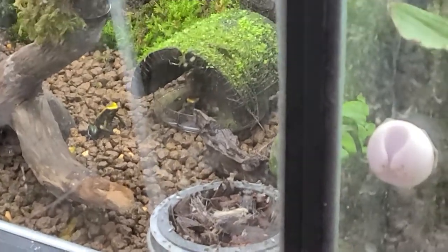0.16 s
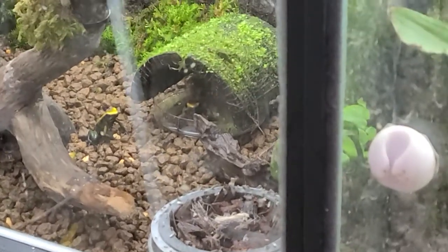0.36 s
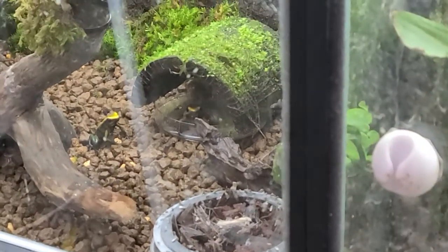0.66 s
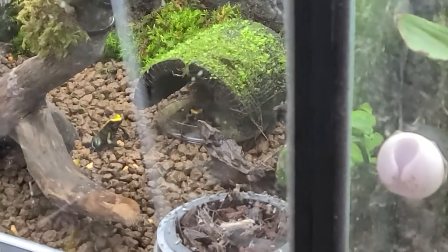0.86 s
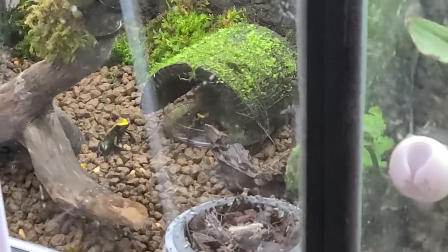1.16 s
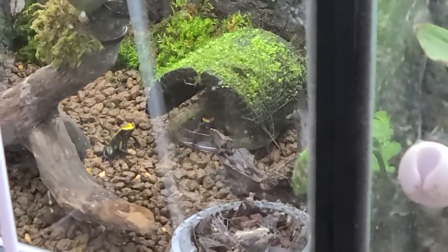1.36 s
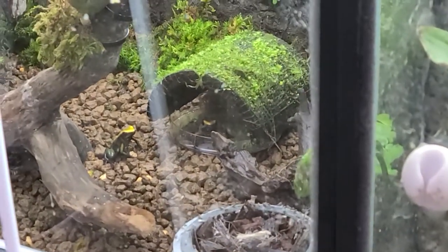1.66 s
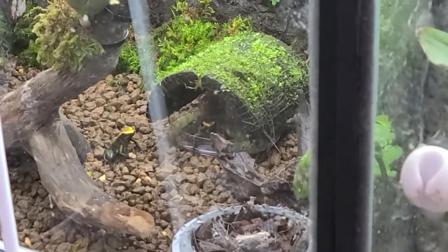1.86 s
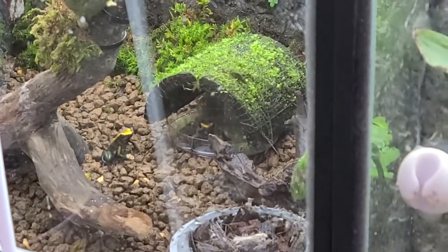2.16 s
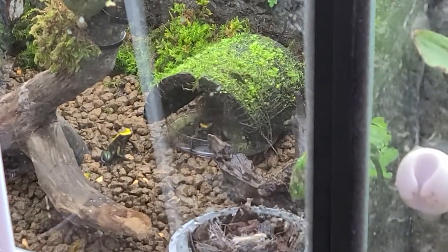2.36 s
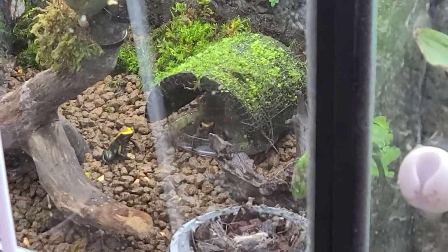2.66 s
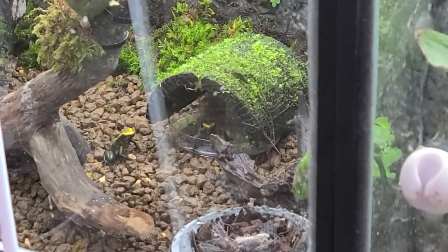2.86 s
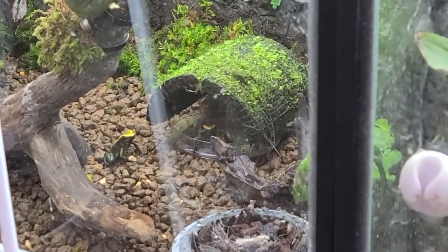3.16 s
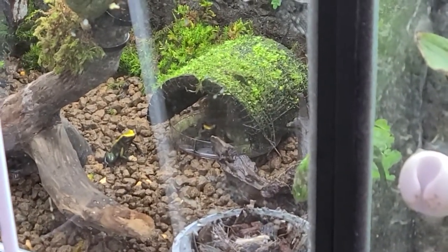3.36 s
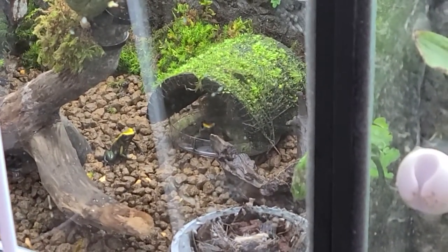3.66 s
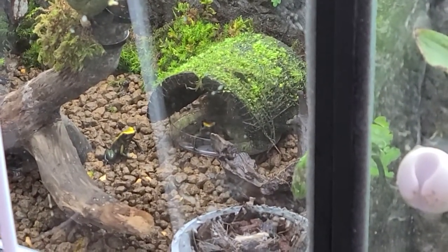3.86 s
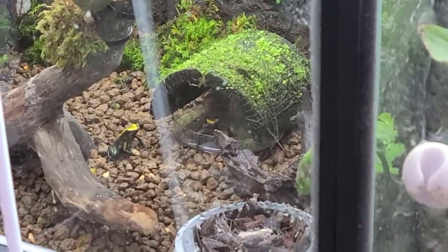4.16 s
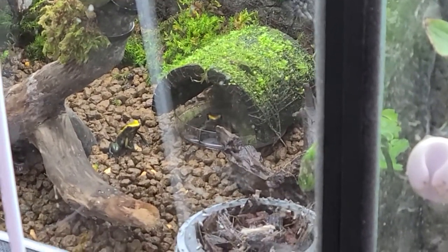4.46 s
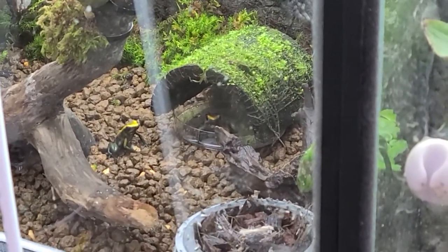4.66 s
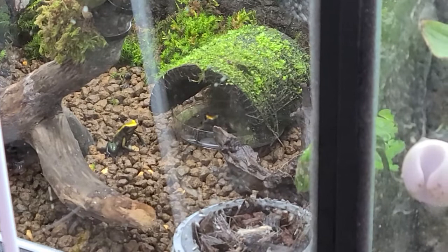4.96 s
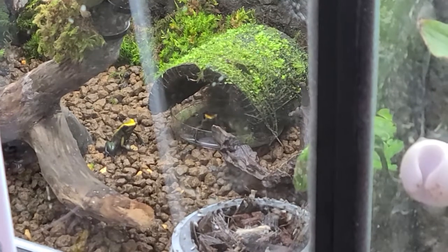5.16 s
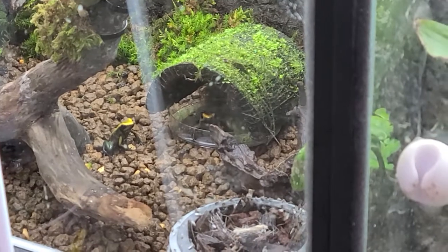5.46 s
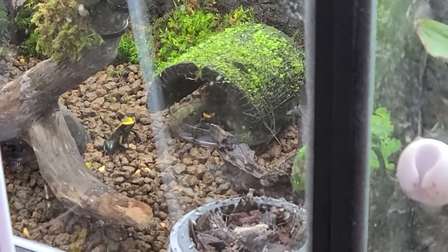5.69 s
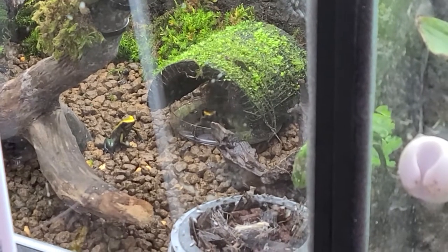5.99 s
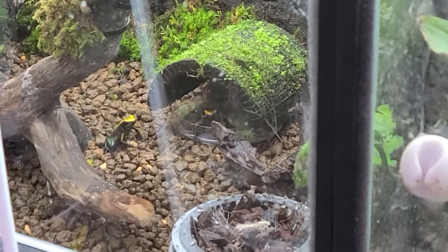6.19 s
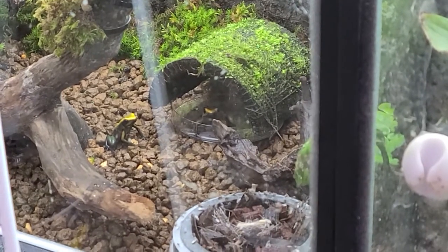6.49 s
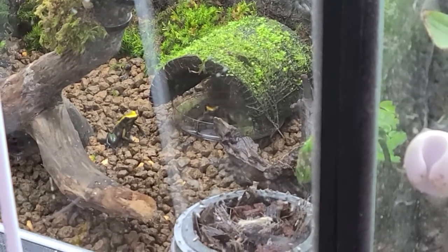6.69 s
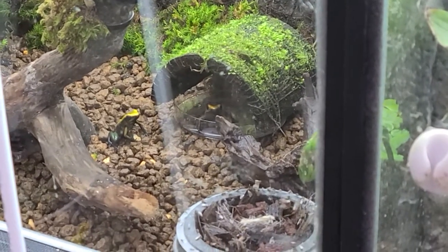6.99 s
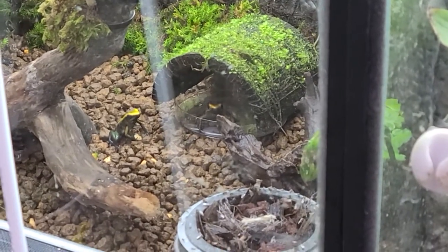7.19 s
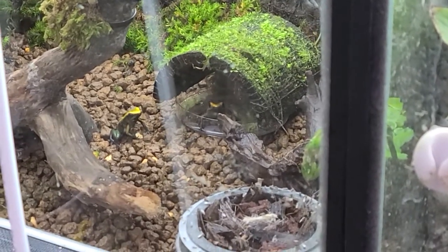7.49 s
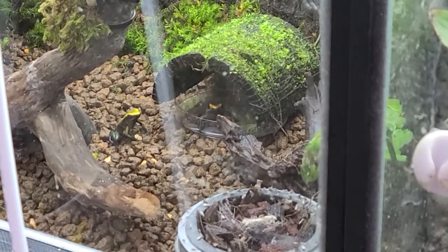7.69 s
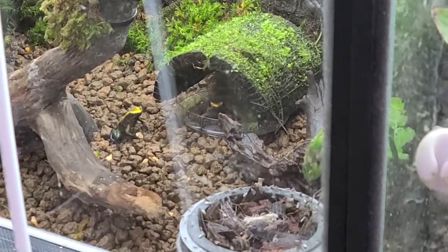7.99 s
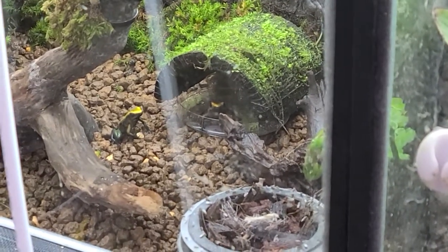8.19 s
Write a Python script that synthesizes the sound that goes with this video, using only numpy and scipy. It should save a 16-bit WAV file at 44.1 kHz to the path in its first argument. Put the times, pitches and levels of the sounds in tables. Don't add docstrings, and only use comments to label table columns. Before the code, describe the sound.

After several seconds of soft machine hum, a tiny frog gives one continuous shrill trill of quick rising chirps, ringing off nearby glass.

```python
import sys
import numpy as np
from scipy import signal
from scipy.fft import rfft, irfft
from scipy.io import wavfile

SR = 44100
rng = np.random.default_rng(int(sys.argv[2]) if len(sys.argv) > 2 else 0)


def boost_factor(decibels):
    exponent = np.asarray(decibels, float) / 20
    return 10 ** exponent


def unload_wav(signal):
    wavfile.write(
        sys.argv[1],
        SR,
        np.round(np.clip(np.atleast_2d(signal).T, -1, 1) * 32767).astype(np.int16),
    )


N = 367794
LEAD_SAMPLES = 8


def rms_one(x):
    return x / np.sqrt(np.mean(x ** 2) + 1e-20)


def at_hz(points, hz):
    table_hz, value = np.array(points)[:, :2].T
    return np.interp(np.log(hz), np.log(table_hz), value)


def coloured(spectrum, size):
    hz = np.maximum(np.fft.rfftfreq(size, 1 / SR), 1)
    return rfft(rng.standard_normal((2, size))) * boost_factor(at_hz(spectrum, hz)), hz


BEAT_NOTES = [0, 1, 8, 14, 22, 30, 41]
BEAT_TIMES = [3.6114, 3.712, 4.517, 5.198, 6.111, 7.019, 8.277]
# t/s, level/dB, pitch shift f/Hz, length/share of the usual
EFFORT_CURVE = [
    (3.61, -26.5, 115, 0.77),
    (3.71, -2.5, 4, .88),
    (3.829, 1.5, -1.5, .88),
    (4.151, 2, 1, 1.026),
    (4.599, 0, 1, 1.01),
    (5.6, 1.5, 1, 1.003),
    (8.301, 0.2, 3, .92),
]


def trill():
    peak_s = np.interp(np.arange(BEAT_NOTES[-1] + 1), BEAT_NOTES, BEAT_TIMES)
    effort_s, *columns = np.transpose(EFFORT_CURVE)
    usual = np.transpose([np.interp(peak_s, effort_s, column) for column in columns])
    uneven = [0.5, 6.35, 0.025]
    db, shift_hz, stretch = (usual + rng.standard_normal(usual.shape) * uneven).T
    note_peak_s = 0.05
    return zip(peak_s - note_peak_s * stretch, shift_hz, db, stretch)


# t/s into the note, pitch f/Hz, strength/linear
NOTE_SHAPE = [
    (0.0, 2481, 0.0),
    (0.004, 2567, 0.02),
    (0.01, 2572, 1.14),
    (0.018, 2634, 0.58),
    (0.026, 2692, 0.94),
    (0.034, 2710, 1.36),
    (0.042, 2733, 0.34),
    (0.05, 2763, 1.34),
    (0.056, 2681, 0.0),
]
# multiple of the pitch, level/dB
OVERTONES = [(0.499, -33.5), (1.251, -38), (1.5, -43), (1.749, -57), (1.998, -51.5), (2.252, -51),
             (2.5, -51), (3, -63), (3.499, -49.5), (3.998, -52)]


def note(t, shift_hz, stretch, wobble_db):
    shape_s, pitch_hz, strength = np.transpose(NOTE_SHAPE)
    u = t / stretch
    turns = np.cumsum(np.interp(u, shape_s, pitch_hz) + shift_hz) / SR

    shake = 0.13 * rng.standard_normal((2, 64))
    loose, slip = (np.interp(t, np.arange(64) * 0.00597, row) for row in shake)
    whistle = np.interp(u, shape_s, strength) * (1 + loose) * np.cos(2 * np.pi * turns + slip)

    overtones = 0
    for (multiple, db), extra_db in zip(OVERTONES, wobble_db):
        overtones = overtones + boost_factor(db + extra_db) * np.cos(2 * np.pi * multiple * turns)
    attack_s, end_s, fade_db_per_s = 0.0083, 0.061, -61.5
    flow = np.clip(u / attack_s, 0, 1) * np.clip((end_s - u) / 0.018, 0, 1)
    return whistle, flow * boost_factor(fade_db_per_s * u) * overtones, flow


# multiple of its pitch, level/dB
HELD_PARTIALS = [(1, -9.5), (1.5, -16), (2, -28), (4, -31.5)]


def opening(t, wobble):
    length_s = 0.013
    swell = np.sin(np.pi * np.clip(t / length_s, 0, 1))
    hz = 2484 + 11.0 * wobble[0]
    tone = sum(boost_factor(db) * np.sin(2 * np.pi * multiple * hz * t) for multiple, db in HELD_PARTIALS)
    return swell * boost_factor(2.8 * wobble[1]) * tone


def paths(echoes, s, hz):
    ms, drift_us, db, drift_db = np.transpose(echoes)[:, :, None]
    drift_from_s, drift_middle_s = 4.6, 6.25
    moved_s = max(s, drift_from_s) - drift_middle_s
    lag_s = ms / 1e3 + drift_us * moved_s / 1e6
    weaker_db = -2 * max(drift_from_s - s, 0) * (ms > ms[0])
    return boost_factor(db + drift_db * moved_s + weaker_db) * np.exp(-2j * np.pi * hz * lag_s)


# f/Hz, level/dB
GLASS_COLOUR = [(2000, 7), (2350, 6), (2500, 5.5), (2620, 5), (2740, -12), (2850, 15), (2950, 0),
                (6000, 6.5), (12000, 6.5)]


def diffuse_tail():
    age_s = np.arange(SR // 2) / SR
    t60_s, build_s = 0.99, 0.045
    envelope = boost_factor(-60 * age_s / t60_s) * np.clip(age_s / build_s, 0, 1) ** 2
    walls = rng.standard_normal((2, len(age_s))) * envelope
    hz = np.fft.rfftfreq(len(age_s), 1 / SR) + 1
    walls = irfft(rfft(walls) * boost_factor(at_hz(GLASS_COLOUR, hz)), len(age_s))
    energy = np.sum(walls ** 2, axis=1, keepdims=True)
    return walls / np.sqrt(energy) * boost_factor(np.array([[-2.5], [2.5]]))


# f/Hz, level/dB per Hz
THROAT_AIR = [(1800, -15), (2150, -0.5), (2450, 6), (2850, 5.5), (3030, -10), (3250, 1), (3500, -11.5),
              (3800, -7.5), (4600, -10), (5300, -7), (6300, -15.5), (7500, -26), (10300, -22.5),
              (11800, -31.5)]
HELD_LEVEL = [-12.5, -4]
HELD_ECHO_LEVEL = [-14, -3]
# f/Hz, left minus right level/dB
PAIR_LEAN = [(60, -1), (110, 2.5), (200, 2.5), (380, 0), (700, -1), (1290, -1.5), (2380, -4.5),
             (4400, -7.5), (8120, -1), (15000, 0)]
# delay t/ms, drift/microseconds per s, level/dB, drift/dB per s
LEFT_PATHS = [(2.80, -4, -19.5, -2.6), (5.665, 13, -20.1, 1.5), (9.345, 18, -25, -1.6),
              (14.678, 20, -25.6, -.3), (19.445, -31, -28.2, -4.7), (21.586, 11, -23.8, -1.7),
              (24.147, 16, -27.5, 2.6), (30.202, -9, -34.4, 1.6), (33.129, 29, -38, -2.5),
              (40.946, 10, -41, -6.6), (43.416, 5, -31.3, -.6), (62.695, 7, -37.7, -.8)]
RIGHT_PATHS = [(2.437, -7, -17.6, -2.5), (5.298, 15, -16.8, .4), (8.963, 6, -21.9, -1.2),
               (11.78, 26, -27.3, 2), (16.25, 18, -22.6, -.2), (20.754, 4, -25, -4),
               (24.31, 26, -28.8, 1.2), (31.12, -3, -25.7, 3.4), (37.078, 24, -27.4, -2.6),
               (44.30, 60, -32, 2), (48.858, 9, -24.2, -.2), (58.65, 72, -37.8, -3.5)]


def frog():
    size = 8192
    t = np.arange(size) / SR
    out, tail_feed = np.zeros((2, N + size)), np.zeros(N + size)
    hz = np.fft.rfftfreq(size, 1 / SR)
    lean = boost_factor(at_hz(PAIR_LEAN, np.maximum(hz, 1)) / 2 * [[1], [-1]])
    lead_s = 0.003
    rasp_apart = 0.89

    for s, shift_hz, db, stretch in trill():
        both, apart = coloured(THROAT_AIR, size)[0]
        rasp = rms_one(irfft([both + rasp_apart * apart, both - rasp_apart * apart]))
        wobble_db = 2.7 * rng.standard_normal(len(OVERTONES))
        whistle, overtones, flow = note(t - lead_s, shift_hz, stretch, wobble_db)

        effort_db = min(0.72 * db - 0.8, 0)
        held_db = np.interp(s, BEAT_TIMES[1::5], HELD_LEVEL)
        held = boost_factor(held_db) * opening(t, rng.standard_normal(2))
        rest = boost_factor(effort_db) * (overtones + held) + boost_factor(-21 + 0.49 * effort_db) * flow * rasp

        each = np.array([paths(side, s, hz) for side in (LEFT_PATHS, RIGHT_PATHS)])
        way, short = each.sum(axis=1), each[:, :7].sum(axis=1)
        short_rms = np.sqrt(np.mean(np.abs(short) ** 2, axis=1, keepdims=True))
        even = short / short_rms * lean * boost_factor(-14.0)
        held_echo_db = effort_db + np.interp(s, BEAT_TIMES[1::5], HELD_ECHO_LEVEL)

        heard = boost_factor(db - 4.0) * rfft(whistle) * way + rfft(rest) * even
        heard = heard + rfft(held) * boost_factor(held_echo_db) * (way - short)
        at = round((s - lead_s) * SR)
        out[:, at:at + size] += irfft(heard)
        tail_feed[at:at + size] += (boost_factor(effort_db) * whistle + boost_factor(3.0) * rest[0]) * boost_factor(-22.5)

    tail = signal.fftconvolve(tail_feed[None, :N], diffuse_tail(), axes=1)
    return out[:, :N] + tail[:, :N]


def narrow(hz, width_hz):
    grid = np.fft.rfftfreq(N, 1 / SR)
    resonance = 1 / (1 + (2 * (grid - hz) / width_hz) ** 2)
    x = rms_one(irfft(rfft(rng.standard_normal(N)) * resonance, N))
    return rms_one(x / np.abs(signal.hilbert(x)).clip(.8))


# multiple of twice the mains frequency, level/dB rms
PUMP_HUM = [(1, -37), (2, -52.5), (3, -57.5), (4, -57), (5, -60.5), (6, -59.5)]
# f/Hz, width f/Hz, level/dB rms
FAN_WHISTLES = [(328.4, 4.2, -56.5), (434.7, 37, -56), (627, 1.5, -52.5), (775, 21, -56),
                (1001, 4.9, -59.5)]
# t/s, level/dB
BUILDING_RUMBLE = [(0.0, -48), (0.6, -54), (2.56, -47), (2.67, -55), (3.51, -47), (4.5, -59), (4.83, -44),
                   (5.02, -45), (5.09, -67), (5.18, -45), (6.53, -41.5), (7.25, -55), (7.27, -49),
                   (8.34, -45.5)]


def machines():
    t = np.arange(N) / SR
    mains_hz = 60
    hum = 0
    for multiple, db in PUMP_HUM:
        phase = rng.uniform(0, 2 * np.pi)
        hum = hum + boost_factor(db) * np.sqrt(2) * np.sin(4 * np.pi * mains_hz * multiple * t + phase)
    fans = sum(boost_factor(db) * narrow(hz, width_hz) for hz, width_hz, db in FAN_WHISTLES)
    rumble_db = np.interp(t, *np.transpose(BUILDING_RUMBLE)) + 1.0
    rumble = narrow(54.2, width_hz=5.0) * boost_factor(rumble_db)
    sound = hum + fans + rumble
    return np.array([sound, np.roll(sound, LEAD_SAMPLES)]) * boost_factor(np.array([[-.95], [.95]]))


# f/Hz, level/dB per Hz
ROOM_SPECTRUM = [(20, -5.5), (35, -8.5), (55, -2.5), (92, 2.5), (106, -10), (150, -16), (225, -10),
                 (295, -16.5), (350, -11.5), (450, -12), (520, -13.5), (700, -7.5), (900, -12), (1200, -8),
                 (1400, -8.5), (1900, -16), (2600, -14), (3200, -18.5), (3900, -25), (5200, -24), (6300, -28),
             (7200, -35.5), (9000, -37), (12000, -39), (16000, -40)]
# f/Hz, likeness 0-1
PAIR_LIKENESS = [(60, 0.9), (130, 1), (290, 0.93), (640, 0.91), (1410, 0.35), (3100, 0), (6820, 0.1),
                 (15000, 0)]


def room_noise():
    (mid, side), hz = coloured(ROOM_SPECTRUM, N)
    alike = np.clip(at_hz(PAIR_LIKENESS, hz), 0, 1)
    lean = boost_factor(at_hz(PAIR_LEAN, hz) / 2)
    shared, separate = np.sqrt(1 + alike) * mid, np.sqrt(1 - alike) * side
    pair = irfft([(shared + separate) * lean, (shared - separate) / lean], N)
    left, right = boost_factor(-38.5) * rms_one(pair)
    swell_db = 0.52 * np.interp(np.arange(N) / SR, np.arange(80) * .11, rng.standard_normal(80))
    return np.array([left, np.roll(right, LEAD_SAMPLES)]) * boost_factor(swell_db)


def scene():
    return frog() * boost_factor(4.0) + machines() + room_noise()


def band_limit(x):
    return signal.sosfilt(signal.butter(12, 16750, fs=SR, output="sos"), x)


def record(dry):
    agc_s, threshold_db, db_off_per_db = 0.091, -27.5, 0.25
    r = np.exp(-1 / (agc_s * SR))
    power = signal.lfilter([1 - r], [1, -r], np.mean(dry ** 2, axis=0))
    over_db = np.maximum(10 * np.log10(power + 1e-12) - threshold_db, 0)

    hiss_band = signal.butter(4, 10500, "high", fs=SR, output="sos")
    hiss = signal.sosfilt(hiss_band, rng.standard_normal(dry.shape))
    noisy = dry + hiss * boost_factor(-72.5 + 1.6 * over_db)

    steep = signal.ellip(12, .3, 60, 15790, fs=SR, output="sos")
    mix = signal.sosfilt(steep, noisy) * boost_factor(-db_off_per_db * over_db)
    return band_limit(mix)


dry = scene()
out = record(dry)
unload_wav(out)
```